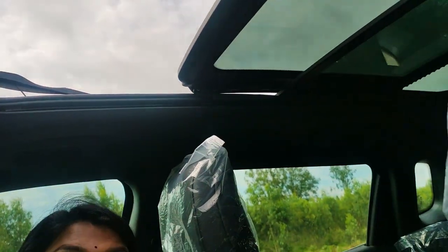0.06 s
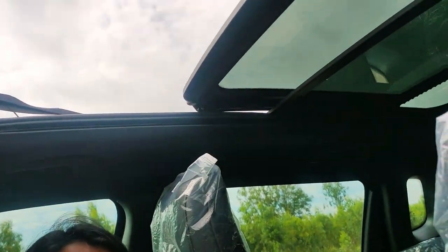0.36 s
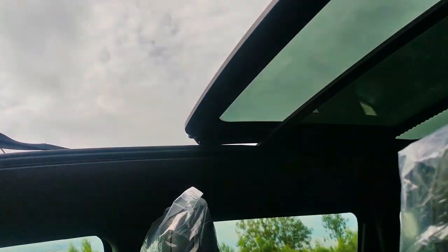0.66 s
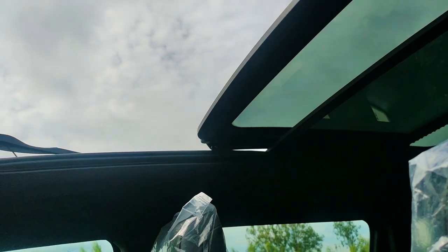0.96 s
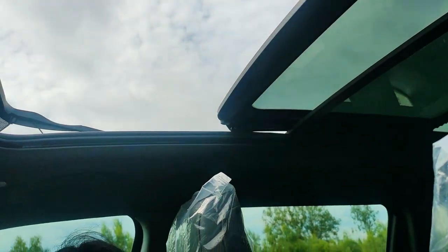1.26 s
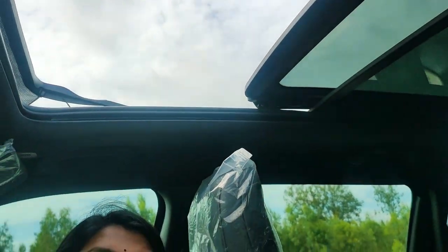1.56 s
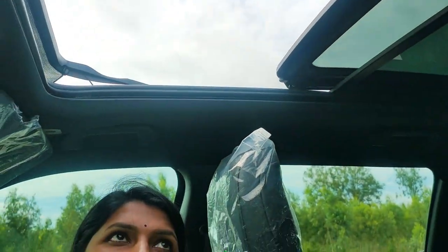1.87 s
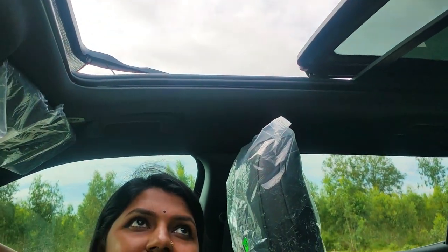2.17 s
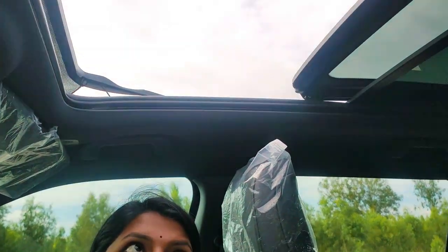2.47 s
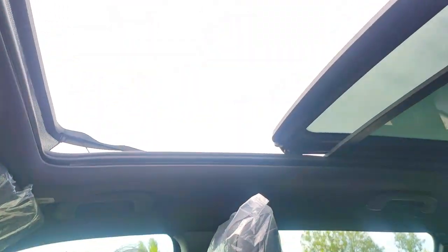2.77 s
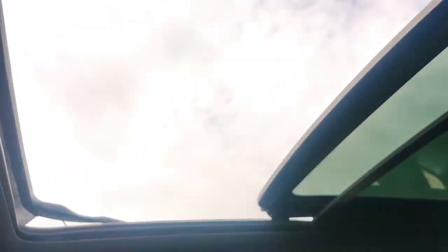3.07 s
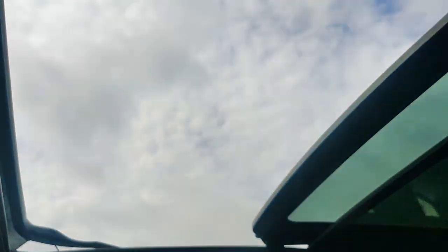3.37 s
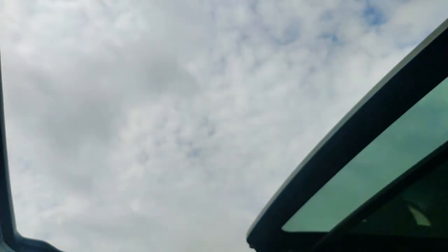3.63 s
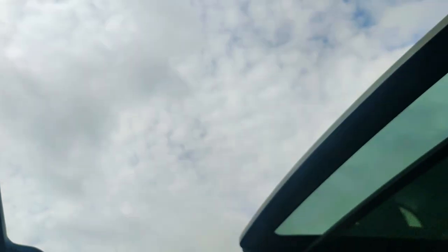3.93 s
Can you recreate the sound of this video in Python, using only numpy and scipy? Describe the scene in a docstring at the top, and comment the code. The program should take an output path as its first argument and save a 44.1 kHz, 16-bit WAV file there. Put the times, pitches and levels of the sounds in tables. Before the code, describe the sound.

Heard from a seat below, an electric sunroof slides, stops with a booming clunk, then runs briefly again. Sharp switch clicks and two soft cloth strokes follow, while the parked car's engine idles and its vents blow.

```python
"""A car's sunroof slides in two short runs, heard from a seat below it.
Its motor whirs with a thin whine; each start and stop clunks and sets the roof panel booming.
Plastic switches click between and after the runs, and something soft, like a sleeve, brushes twice
over the seat. Behind it all, the parked car's engine idles and the ventilation blows."""
import sys
import numpy as np
from scipy import signal
from scipy.io import wavfile

SR = 44100
rng = np.random.default_rng(int(sys.argv[2]) if len(sys.argv) > 2 else 0)


def transcribe(signal):
    """Save signal, clipped to [-1, 1], as a 16-bit WAV file at the path in sys.argv[1]."""
    frames = np.atleast_2d(signal).T
    limited = np.clip(frames, -1, 1)
    pcm = np.round(limited * 32767).astype(np.int16)
    wavfile.write(sys.argv[1], SR, pcm)


N = 176400
T = np.arange(N) / SR

# Motor runs. Each row: start and stop in seconds, then whir, gear whistle and panel throb in dB.
MOTOR_RUNS = [(-.1, 0.686, -54.5, -73.5, -37.5), (1.365, 1.798, -54.5, -100, -38)]
SPIN_UP_S, SPIN_DOWN_S, WHISTLE_HZ, THROB_HZ = 0.0087, 0.023, 4432, 41
# Whir of the gears and of the panel in its rails. Each row: frequency in Hz, relative level in dB.
WHIR_SPECTRUM = [(200, -4.5), (450, 0.5), (700, -2.5), (1000, -3.5), (1300, -2.5), (2000, -10.5),
                 (3000, -16.5), (4200, -20.5), (6000, -21.5), (10000, -29), (15500, -35)]
# The motor's whine. Each row: pitch in Hz, peak level in dB.
WHINE_TONES = [(506, -63.5), (1222, -74), (2530, -70.5), (3795, -81)]
# Hiss of the seal as the panel slides. Each row: time in seconds, level in dB.
SEAL_HISS = [(0, -95), (.54, -78), (.63, -65), (.68, -63), (.78, -80), (1.36, -96), (1.52, -68),
             (1.66, -69), (1.74, -85), (1.8, -58), (1.83, -99)]

# The drive starts or stops. Each row: time in seconds, clunk level in dB, boom level in dB.
DRIVE_CLUNKS = [(.668, -38.5, -22), (1.365, -37.5, -22), (1.779, -39.5, -20.5)]
# The noise in a clunk. Each row: frequency in Hz, relative level in dB.
CLUNK_SPECTRUM = [(70, -5), (130, 7.5), (260, 1), (430, 3.5), (800, -5.5), (1400, -6), (2500, -20),
                  (5000, -27.5), (15000, -36)]
CLUNK_ATTACK_S, CLUNK_T60_S = .009, 0.097   # at 1000 Hz; a T60 is the time to fade by 60 dB
HOUSING_HZ, HOUSING_DB, HOUSING_ATTACK_S, HOUSING_T60_S = 430, -7.5, .018, 0.13
# The roof panel's deep ringing. Each row: pitch in Hz, relative level in dB, T60 in seconds.
ROOF_TONES = [(22.77, -1, 0.62), (51.9, -10.5, 1.53)]

# Switch clicks. Each row: time in seconds, then thump, knock, clack, snap and top treble in dB,
# then contact time in seconds.
SWITCH_CLICKS = [(1.0734, -52, -45, -37.5, -53.5, -57, 0.0038),
                 (1.1054, -48.5, -69, -51, -47.5, -54, 0.0006),
                 (1.3023, -36.5, -36, -44, -46.5, -49, 0.00052), (2.092, -82, -79, -61, -59, -53, .003),
                 (2.401, -78, -66, -50, -58, -68, 0.0037), (2.415, -54.5, -42, -38.5, -57, -59, 0.0047),
                 (2.4545, -66, -57, -55, -59, -62, 0.00055), (2.6684, -38.5, -32.5, -39, -45, -50, 0.0015),
                 (3.236, -49.5, -49.5, -40, -53, -67, 0.0034), (3.27, -76, -64, -50, -52, -59, 0.0023),
                 (3.3092, -70, -60, -53, -56, -59, .003), (3.358, -70, -63, -51.5, -59, -58, .002),
                 (3.412, -58, -40, -39.5, -40.5, -52, 0.0028), (3.4977, -70, -56, -47, -72, -69, .002),
                 (3.5303, -37.5, -39, -35.5, -35, -35.5, 0.0016), (3.5602, -55, -66, -51, -46, -51, 0.0011),
                 (3.7315, -70, -71, -49.5, -62, -70, 0.0023), (3.7671, -51.5, -40, -34, -46, -37.5, 0.0038)]
# Where thump, knock, clack, snap and top treble lie, in Hz.
CLICK_RANGES_HZ = [280, 830, 1900, 6500, 13000]
# Ringing of a switch and its console. Each row: pitch in Hz, relative level in dB, T60 in seconds.
SWITCH_TONES = [(185, -1.5, 0.043), (253.5, 9, 0.064), (723, -3.5, 0.094), (825, -1, 0.066),
                (894, -6.5, 0.053), (1347, -9.5, 0.072), (1709, -10.5, 0.068), (1886, -7, 0.037),
                (2251, -12.5, 0.07), (3463, -15, 0.04), (7180, -19, 0.06), (7470, -6.5, 0.041),
                (7700, -17.5, 0.082), (9660, -12, 0.042)]
# The contact's crack, scattered by the cabin. Each row: frequency in Hz, relative level in dB.
CRACK_SPECTRUM = [(150, 12), (260, -35), (500, 9.5), (850, 6), (1900, -2), (3000, -6.5), (4300, -6.5),
                  (8000, -3.5), (11000, -8), (15500, -34)]
RING_DB, CRACK_DB, CRACK_T60_S = -2, -0.5, 0.079   # T60 at 1000 Hz
CABIN_TONE_HZ, CABIN_TONE_DB = 159, -3.5

# Cloth strokes. Each row: start and end in seconds, level in dB, fade-in and fade-out in seconds.
CLOTH_STROKES = [(2.66, 3.203, -61, 0.14, 0.23), (3.12, 3.775, -61.5, 0.11, .17)]
# Rubbing noise of both cloth and seal. Each row: frequency in Hz, relative level in dB.
RUB_SPECTRUM = [(500, -28.5), (1000, 8.5), (2000, 9.5), (3500, 7), (5000, 6), (7500, 7), (10000, 7.5),
                (13500, 2), (15500, 0)]

# The engine's tones. Each row: multiple of the firing rate, average (rms) level in dB.
ENGINE_TONES = [(1, -34.5), (2, -54.5)]
FIRING_HZ = 29.05
# The rush of the ventilation. Each row: frequency in Hz, relative level in dB.
AIR_SPECTRUM = [(25, -55.5), (50, -61.5), (75, -70.5), (125, -70.5), (190, -76), (320, -78), (500, -81),
                (700, -84), (1000, -93), (1600, -98.5), (2500, -104), (4000, -108), (7000, -109),
                (11000, -112), (15500, -115)]
AIR_DB = -45
# Cabin hums stirred by the air. Each row: pitch in Hz, width in Hz, average (rms) level in dB.
AIR_HUMS = [(104, 7.9, -52.5), (126.4, 22.8, -59.5), (261.2, 19, -65.5), (421.9, 18, -62.5), (494, 20, -69),
            (615.5, 122, -62.5)]
# Faint rustles and squeaks. Each row: start and end in seconds, pitch and width in Hz, level in dB.
FAINT_RUSTLES = [(.8, 0.98, 1970, 700, -72.5), (1.08, 1.226, 2040, 600, -66),
                 (1.193, 1.295, 1564, 120, -64.5), (3.807, 4.1, 1690, 454, -65)]
RUSTLE_FADE_S, CUTOFF_HZ = 0.063, 15700


def sunroof_motor():
    """The running motor whines, its gears whir and whistle, the panel throbs and the seal hisses."""
    grain = 1 + 0.067 * drift(40)
    whir = noise(WHIR_SPECTRUM, flicker_db=0.74) * grain
    speed = 1 + .0045 * drift(64)   # all the tones waver together
    phase_per_hz = 2 * np.pi * np.cumsum(speed) / SR
    whine = sum(from_db(db + 2 * drift(50)) * np.sin(hz * phase_per_hz) for hz, db in WHINE_TONES)
    seal_db = np.interp(T, *np.transpose(SEAL_HISS))
    out = from_db(seal_db) * noise(RUB_SPECTRUM)
    for start, stop, whir_db, whistle_db, throb_db in MOTOR_RUNS:
        whistle = from_db(whistle_db) * np.sin(WHISTLE_HZ * phase_per_hz)
        throb = from_db(throb_db) * np.sin(THROB_HZ * phase_per_hz)
        running = fade_in_out(start, stop, SPIN_UP_S, SPIN_DOWN_S)
        out += running * (from_db(whir_db) * whir + whine + whistle + throb)
    return out


def sunroof_clunks():
    """Each start and stop knocks the drive housing and rocks the roof panel."""
    out, bands = np.zeros(N), noise_bands(CLUNK_SPECTRUM)
    for start, clunk_db, boom_db in DRIVE_CLUNKS:
        age = T - start
        span = slice(int(start * SR), int(start * SR) + SR // 3)
        for hz, band in bands:
            slowness = (1000 / hz) ** 0.68   # low bands swell later and last longer
            shape = strike(age[span], CLUNK_ATTACK_S * slowness, CLUNK_T60_S * slowness)
            out[span] += from_db(clunk_db) * shape * band[span]
        out += ring(age, HOUSING_HZ, clunk_db + HOUSING_DB, HOUSING_ATTACK_S, HOUSING_T60_S)
        for hz, db, t60 in ROOF_TONES:
            out += ring(age, hz, boom_db + db, attack_s=0.073, t60_s=t60)
    return out


def switch_clicks():
    """Each click rings the console and the cabin, and scatters a crack whose treble dies first."""
    out, bands = np.zeros(N), noise_bands(CRACK_SPECTRUM)
    for start, *range_db, contact_s in SWITCH_CLICKS:
        span = slice(int(start * SR), int(start * SR) + SR // 5)
        age = np.maximum(T[span] - start, 0)
        force = list(zip(CLICK_RANGES_HZ, range_db))
        for hz, db, t60 in SWITCH_TONES:
            tone_db = RING_DB + db + db_at(force, hz)
            out[span] += ring(age, hz, tone_db, contact_s, t60, phase=rng.random())
        cabin_db = CABIN_TONE_DB + np.mean(range_db[1:3])   # follows the knock and clack
        out[span] += ring(age, CABIN_TONE_HZ, cabin_db, attack_s=0.015, t60_s=0.17)
        for hz, band in bands:
            t60 = CRACK_T60_S * (1000 / hz) ** 0.17
            out[span] += from_db(CRACK_DB + db_at(force, hz)) * strike(age, contact_s, t60) * band[span]
    return out


def cloth_brushing():
    """Cloth rubs over the seat in two soft, bright strokes."""
    pressure = sum(from_db(db) * fade_in_out(start, end, fade_in, fade_out)
                   for start, end, db, fade_in, fade_out in CLOTH_STROKES)
    return pressure * noise(RUB_SPECTRUM)


def engine_idle():
    """The engine's firings make a deep throb that wavers slightly in speed and level."""
    firings = np.cumsum(FIRING_HZ * (1 + .006 * drift(2.4))) / SR
    out = np.zeros(N)
    for multiple, db in ENGINE_TONES:
        peak = np.sqrt(2) * from_db(db + .7 * drift(2.8))
        out += peak * np.sin(2 * np.pi * (multiple * firings + rng.random()))
    return out


def ventilation():
    """Blowing air makes a low rush and sets the cabin humming."""
    hums = sum(from_db(db) * pitched_noise(hz, width) for hz, width, db in AIR_HUMS)
    return from_db(AIR_DB) * noise(AIR_SPECTRUM, flicker_db=1) + hums


def rustles():
    """Faint rustles and squeaks: short swells of pitched noise."""
    out = np.zeros(N)
    for start, end, hz, width, db in FAINT_RUSTLES:
        swell = fade_in_out(start, end, RUSTLE_FADE_S, RUSTLE_FADE_S)
        out += from_db(db) * swell * pitched_noise(hz, width)
    return out


def from_db(db):
    """Turn decibels into a factor to multiply by."""
    return 10 ** (np.asarray(db) / 20)


def rms_one(x):
    """Scale a signal to an average (rms) level of 1."""
    return x / np.sqrt(np.mean(x ** 2) + 1e-20)


def db_at(spectrum, hz):
    """Read a level between a spectrum's rows, with octaves evenly spaced."""
    row_hz, row_db = np.transpose(spectrum)
    return np.interp(np.log(hz), np.log(row_hz), row_db)


def drift(rate_hz):
    """A smooth random wander of about 1 either way; a higher rate wanders faster."""
    step = 40   # samples between random points
    memory = np.exp(-2 * np.pi * rate_hz * step / SR)
    white = rng.standard_normal(N // step + 2002)
    slow = signal.lfilter([1], [1, -2 * memory, memory ** 2], white)[2000:]
    return np.interp(np.arange(N) / step, np.arange(len(slow)), rms_one(slow))


def noise_bands(spectrum):
    """Noise in bands a third of an octave wide, as (Hz, samples); together they have rms 1."""
    edges = 20 * 2 ** (np.arange(30) / 3)
    centres = np.sqrt(edges[1:] * edges[:-1])
    white = rng.standard_normal((2, N + SR // 4))   # neighbouring bands use different noise
    bands = []
    for k, hz in enumerate(centres):
        band_pass = signal.butter(2, edges[k:k + 2], "band", fs=SR, output="sos")
        bands.append(from_db(db_at(spectrum, hz)) * signal.sosfilt(band_pass, white[k % 2])[-N:])
    return list(zip(centres, np.array(bands) / sum(bands).std()))


def noise(spectrum, flicker_db=0):
    """Noise shaped by a spectrum; each band can flicker on its own."""
    return rms_one(sum(band * from_db(flicker_db * drift(4.7)) for _, band in noise_bands(spectrum)))


def pitched_noise(hz, width_hz):
    """Noise sent twice through one resonance; the narrower it is, the clearer the pitch."""
    r = np.exp(-np.pi * width_hz / SR)
    resonance = [1, 0, -1, 1, -2 * r * np.cos(2 * np.pi * hz / SR), r * r]
    return rms_one(signal.sosfilt([resonance, resonance], rng.standard_normal(N + SR))[-N:])


def fade_in_out(start, end, fade_in_s, fade_out_s):
    """A level that rises, holds and falls between two times."""
    return np.clip((T - start) / fade_in_s, 0, 1) * np.clip((end - T) / fade_out_s, 0, 1)


def strike(age, attack_s, t60_s):
    """The level of a hit: it rises during the attack, then dies away."""
    return np.clip(age / attack_s, 0, 1) * from_db(-60 * np.clip((age - attack_s) / t60_s, 0, 3))


def ring(age, hz, db, attack_s, t60_s, phase=0):
    """One fading tone of a struck object; phase is in cycles."""
    return from_db(db) * strike(age, attack_s, t60_s) * np.sin(2 * np.pi * (hz * age + phase))


def scene():
    """All the sources added into one channel."""
    sunroof = sunroof_motor() + sunroof_clunks()
    return (sunroof + switch_clicks() + cloth_brushing() + engine_idle() + ventilation() + rustles())[None]


def record(dry):
    """Cut off the highest treble steeply."""
    return signal.sosfilt(signal.ellip(12, .1, 80, CUTOFF_HZ, fs=SR, output="sos"), dry)


dry = scene()
out = record(dry)
transcribe(out)
```